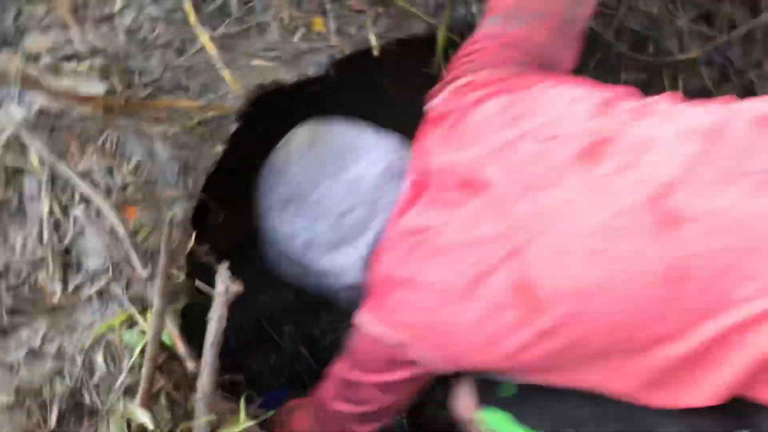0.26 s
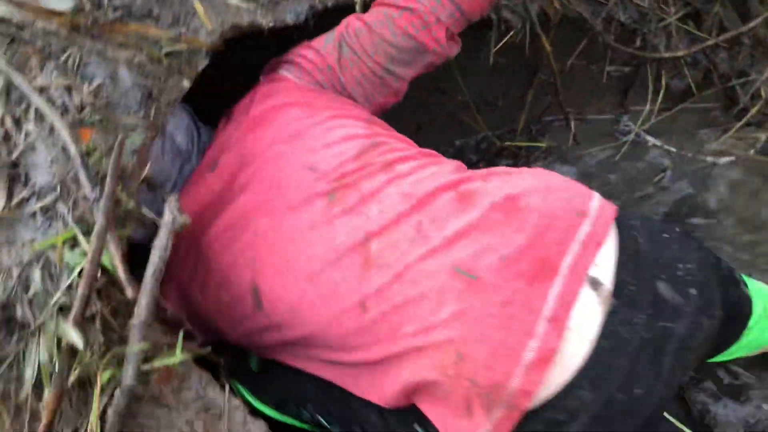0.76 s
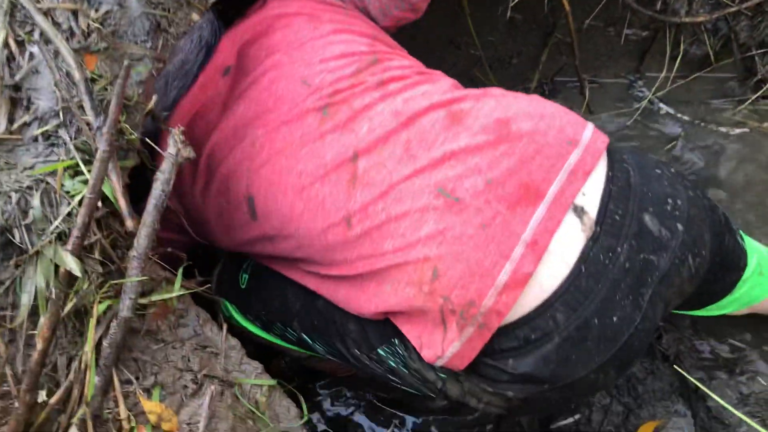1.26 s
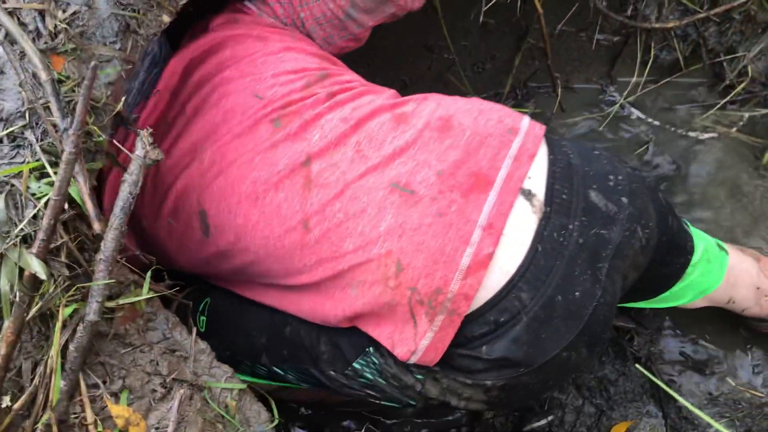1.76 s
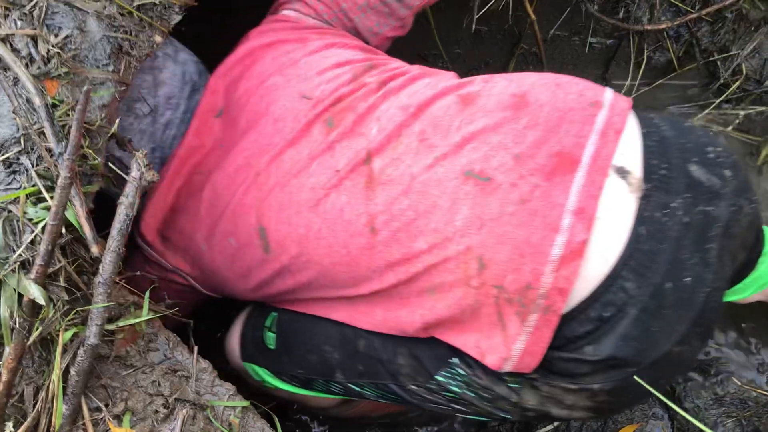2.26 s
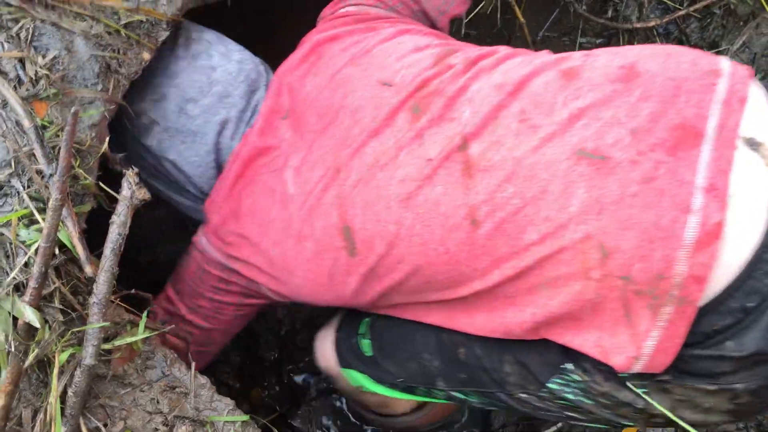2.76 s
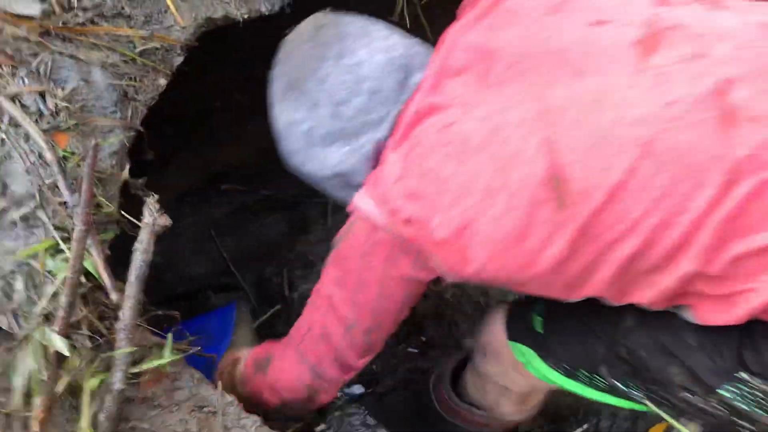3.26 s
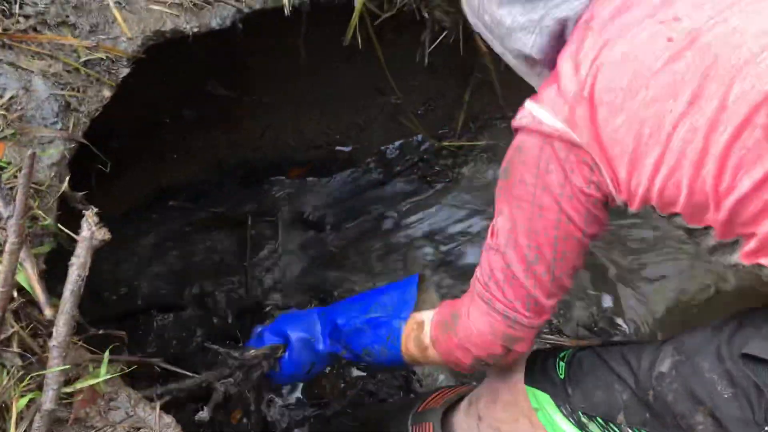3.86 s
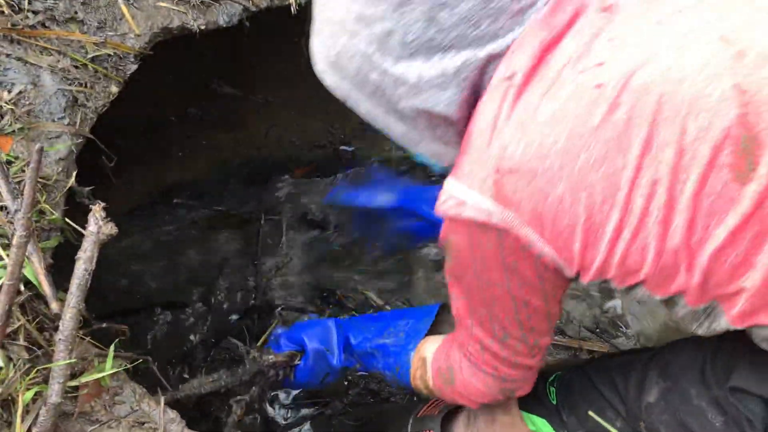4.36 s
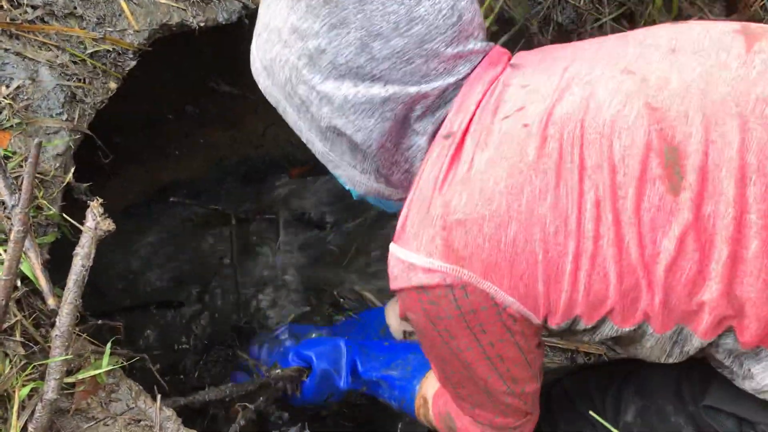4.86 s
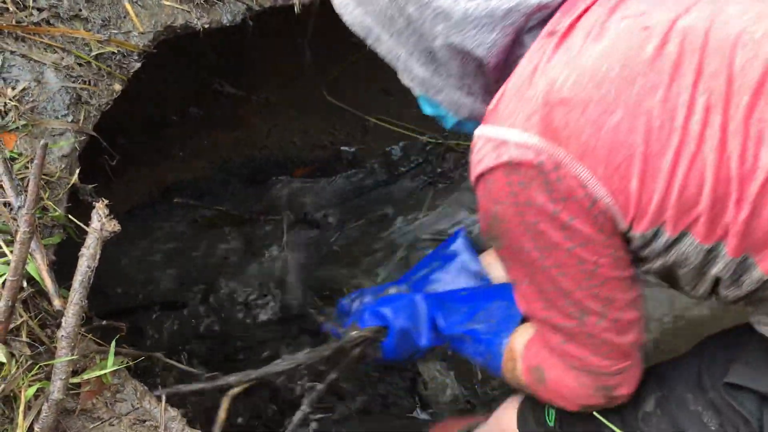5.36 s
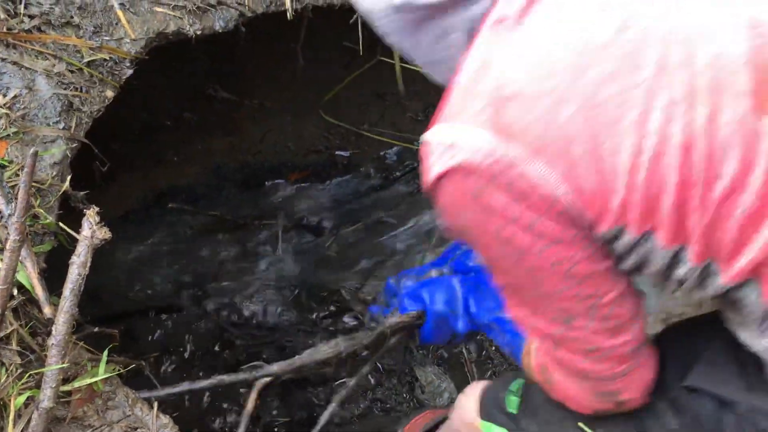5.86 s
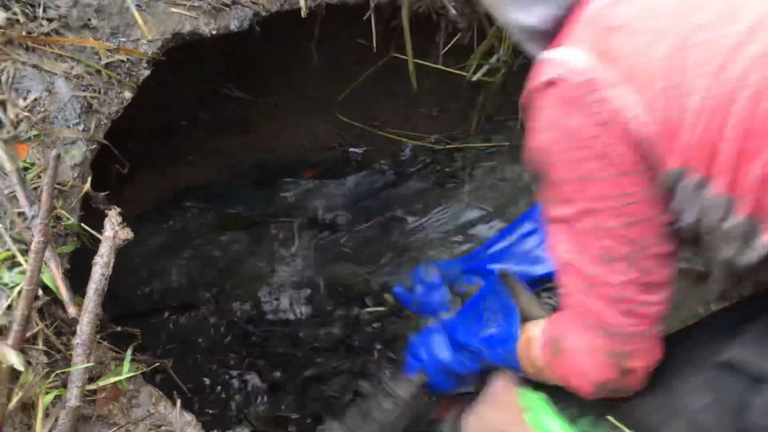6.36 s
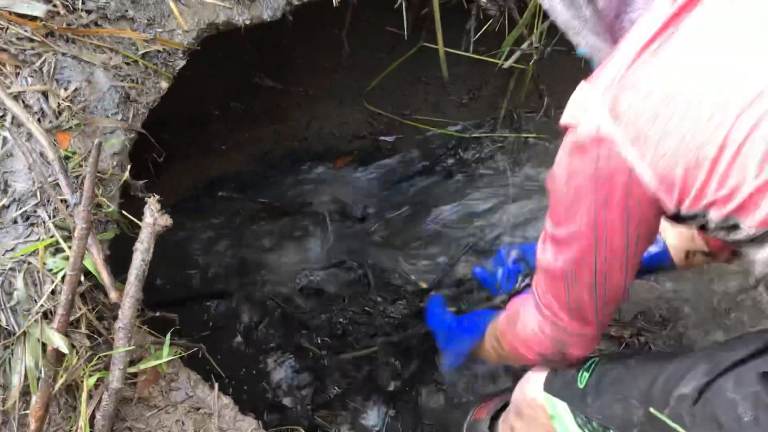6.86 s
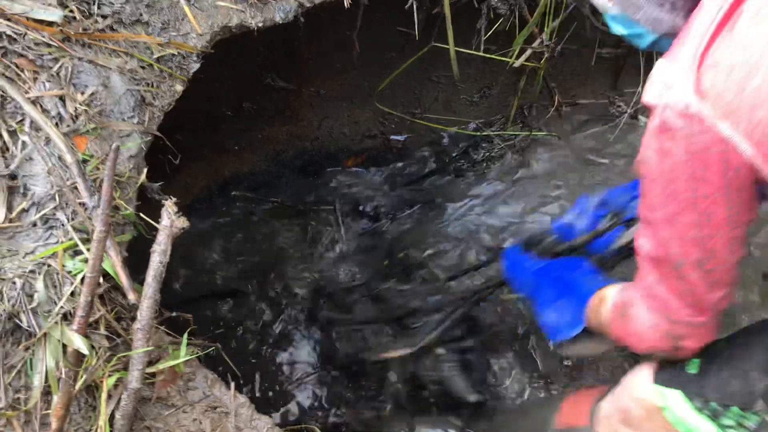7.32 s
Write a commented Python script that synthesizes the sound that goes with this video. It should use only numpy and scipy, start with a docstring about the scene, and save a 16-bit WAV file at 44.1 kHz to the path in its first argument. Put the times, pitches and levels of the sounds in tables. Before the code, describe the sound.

A close single microphone catches gurgling water being stirred at a pipe opening. It is duller at first, with single bubble plops and a low glug, then a woody crack opens into brighter trickling and small twig crackles. Thick sloshes and plops burst out late, a twig snaps loudly, and a faint engine far away climbs in pitch.

```python
"""Shallow water trickles through a culvert's mouth while hands clear it; a far engine drones over a rumble.
Clouds of ringing bubbles make the water, single larger bubbles plink, and noise bursts tick as wet twigs.
From about 2.4 s deep air pockets glug and mud sloshes; at 3.3 s a stick cracks, as splintery noise and ringing modes.
Near 6.5 s bubbles and sloshes crowd together, a twig snaps hard at 6.8 s and the engine climbs to the end.
Water and wood carry the pipe's short echo, made of decaying noise."""
import sys
import numpy as np
from scipy import signal
from scipy.fft import rfft, irfft, next_fast_len
from scipy.io import wavfile
from scipy.ndimage import map_coordinates

SR = 44100
rng = np.random.default_rng(int(sys.argv[2]) if len(sys.argv) > 2 else 0)


def dump_mix(stems):
    """Bounce the given channels to the path in sys.argv[1] as a 16-bit WAV at rate SR."""
    frames = np.atleast_2d(stems).T  # one column per channel
    limited = np.clip(frames, -1, 1)  # hard clip at full scale
    pcm = np.round(limited * 32767).astype(np.int16)
    wavfile.write(sys.argv[1], SR, pcm)


N = 334719  # length in samples

# Every spectrum is a noise colour [f/Hz, relative density level/dB]; its sound is then set to rms 1.
# Diffuse echo of the culvert wall: [f/Hz, time to fall 60 dB/s]
PIPE_DECAY = [(200, 0.23), (1000, 0.23), (3000, 0.15), (8000, 0.15), (15000, 0.2)]

# Spectrum of the large bubbles with the pipe's mouth covered: [f/Hz, level/dB]
GURGLE_COVERED_SPECTRUM = [(250, -23), (480, -11.5), (640, -5.5), (850, 0), (1100, -1.5), (1500, -8),
                           (2200, -11.5), (4000, -34)]
# The same with the mouth clear: [f/Hz, level/dB]
GURGLE_OPEN_SPECTRUM = [(250, -23), (520, -12), (750, -5.5), (1000, -1), (1300, -2), (1600, -4.5),
                        (2200, -8.5), (4000, -42)]
# Spectrum of the small bubbles at the mouth: [f/Hz, level/dB]
TRICKLE_SPECTRUM = [(350, -48), (700, -2), (1300, 0.5), (1900, -1.5), (2900, -1.5), (4200, -5),
                    (6000, -10.5), (10000, -19)]
# Spectrum of the droplets: [f/Hz, level/dB]
SPRAY_SPECTRUM = [(600, -50), (2500, 6), (4500, -2), (7000, 0), (8800, 0.5), (10300, -6), (12000, -1.5),
                  (15500, -3)]
# How far the body is clear of the pipe's mouth: [t/s, openness from 0 covered to 1 open]
MOUTH_CLEAR = [(0, 0.53), (.5, 0.24), (2.6, 0.042), (3.6, 0.59), (4.4, 0.96), (7.59, 0.71)]
# How hard the hands stir the water: [t/s, level over the calm flow/dB], scaled per layer by the GROWS values
STIRRING = [(0, 4.5), (.35, -1), (3.1, 1), (3.45, 5), (3.9, 2.5), (6.05, 0.5), (6.66, 7.5), (6.97, 1),
            (7.59, 5.5)]
GURGLE_DB, TRICKLE_DB, SPRAY_DB = -44, -47, -53  # calm flow, mouth covered
GURGLE_GROWS, TRICKLE_GROWS, SPRAY_GROWS = .7, 1, 0.82  # dB gained per dB of stirring
GURGLE_OPEN_DB, SPRAY_OPEN_DB = -3.5, 4.5  # change when the mouth is clear
SURGE_DB, EDDY_DB = 1.06, 0.46  # ripples shared by the whole stream; slow eddies of gurgle and trickle apart

# Distant engine: [t/s, firing rate f/Hz, level of the boom on that rate/dB]
ENGINE_RUN = [(0, 45.9, -67), (.6, 48, -50), (1.3, 53.1, -58), (1.7, 59.23, -46), (3, 60.5, -56),
              (6, 63, -57.5), (6.35, 60.4, -61), (6.7, 72, -56), (7.59, 82.2, -49.5)]
# Mean levels of the engine's second and third harmonics: [level/dB]
ENGINE_HARMONICS_DB = [-57, -66]
# Spectrum of the outdoor rumble: [f/Hz, level/dB]
RUMBLE_SPECTRUM = [(16, -60), (25, -32), (36, -7.5), (50, -2.5), (85, -2.5), (105, -2.5), (145, -4),
                   (200, -11), (280, -16), (400, -19.5), (700, -36), (1200, -78)]
# Rumble over time: [t/s, level/dB]
RUMBLE_LEVEL = [(0, -48.5), (1.3, -49), (4.6, -52), (7.59, -44)]

# Single large bubbles: [t/s, level before PLOP_TRIM_DB/dB, pitch f/Hz]
PLOP_EVENTS = [(0.392, -20.5, 1000), (0.809, -20.5, 960), (0.965, -20, 1860), (1.103, -21, 1095),
               (1.509, -24.5, 894), (1.761, -14.5, 2800), (1.969, -25, 914), (2.287, -21, 1175),
               (2.741, -17.5, 990), (2.959, -22, 1150), (3.155, -20, 1520), (3.611, -16, 1193),
               (4.133, -13.5, 2030), (4.464, -21, 1160), (5.445, -14.5, 1530), (5.61, -22, 1330),
               (5.759, -15.5, 2850), (6.318, -17, 1650), (6.452, -11, 1330), (6.471, -9, 1140),
               (6.497, -10, 830), (6.624, -15, 1034), (6.685, -7, 804), (7.156, -19, 1990),
               (7.209, -20, 1330), (7.237, -18.5, 865)]
PLOP_TRIM_DB = -2.0  # on the plops and the lesser plips alike
# Lesser bubbles break at random, higher in pitch when the pipe's mouth is clear
PLIP_PER_S, PLIP_DB, PLIP_HZ, PLIP_OPEN_OCTAVES, PLIP_SPREAD_OCTAVES = 3.5, -28.5, 859, 0.465, 0.24
# A smaller bubble pinches off each one: mean delay, relative level, pitch ratio
DAUGHTER_S, DAUGHTER_DB, DAUGHTER_RATIO = .013, -8.5, 1.26

# Wet twigs: [t/s, tick level/dB, woody knock relative level/dB, wet fizz relative level/dB], before trims
TWIG_EVENTS = [(1.2755, -23.5, -24, -28), (1.7624, -32.5, 9, -21), (2.8485, -23, -11, -4),
               (3.1552, -35, -10, 2), (3.243, -21.5, -21, -3), (5.2884, -31.5, 6.5, -16),
               (5.5344, -22, -4.5, -4), (5.7432, -26.5, -9, -25), (5.7874, -15, -7, -10),
               (5.9217, -23, -20, -4), (6.0863, -27, 1.5, 1), (6.6404, -20.5, -12, -3),
               (6.785, -5, -32, -13), (6.8355, -19, -4.5, -4), (7.3718, -25, -6, 0),
               (7.5518, -12.5, -1.5, -30)]
# Spectrum of the bright tick: [f/Hz, level/dB]
TICK_SPECTRUM = [(1500, -28), (3300, -4), (4500, 3.5), (7000, 1.5), (9000, -6.5), (12000, -12)]
# Spectrum of the woody knock: [f/Hz, level/dB]
KNOCK_SPECTRUM = [(300, -22), (900, -2), (1500, 2.5), (2900, 1), (4200, -6), (8000, -40)]
# Spectrum of the wet fizz: [f/Hz, level/dB]
FIZZ_SPECTRUM = [(6000, -30), (9000, 2), (12000, 5), (15500, -5)]
TWIG_TRIM_DB, KNOCK_TRIM_DB, FIZZ_TRIM_DB = -0.5, 4.5, 0.5
# While the tangle is being pulled, small twigs give way at random; the trims apply to them too
PULL_FROM_S, PULL_TO_S = 3.1, 6.4
RUSTLE_PER_S, RUSTLE_DB, RUSTLE_KNOCK_DB, RUSTLE_FIZZ_DB, RUSTLE_SPREAD_DB = 4.1, -30.5, -10, -7.5, 0.5

# Deep air pockets in the mud: [t/s, level/dB, starting pitch f/Hz, share of pitch gained over the bubble's life]
GLUG_EVENTS = [(2.359, -32, 378.6, 1.1), (2.498, -41, 405, .2), (7.502, -38, 394, 0.23)]

# Mud and water churned by the hands: [t/s, level/dB, length/s, low edge f/Hz, high edge f/Hz]
SLOSH_EVENTS = [(2.817, -44, 0.11, 200, 9000), (3.341, -38.5, 0.073, 1800, 14000),
                (3.408, -45, 0.25, 1190, 8850), (5.431, -39.5, 0.05, 700, 5000),
                (5.916, -35.5, 0.013, 350, 6000), (6.142, -36, 0.087, 380, 4050),
                (6.209, -33.5, 0.029, 130, 3050), (6.294, -37, 0.072, 350, 4970),
                (6.43, -31.5, 0.026, 250, 4500), (6.47, -31, 0.066, 450, 1900),
                (6.621, -31, 0.025, 200, 3000), (6.634, -24.5, 0.028, 199, 7040),
                (6.678, -28, 0.013, 350, 1300), (6.66, -36.5, 0.19, 650, 5500),
                (7.353, -28.5, 0.034, 250, 11000)]
# Spectrum of the churned mud: [f/Hz, level/dB]
SLOSH_SPECTRUM = [(80, 7), (180, -2), (400, 2), (750, 2.5), (1200, 1), (2000, -2.5), (4000, -5.5),
                  (7000, -8), (10000, -13), (15500, -6)]

# Quick fractures of the thick stick: [t/s, level/dB]
STICK_FRACTURES = [(3.3189, -16), (3.322, -6)]
# Ringing modes of the stick: [f/Hz, level before STICK_RING_DB/dB, time to fall 60 dB/s]
STICK_MODES = [(1105, -9, 0.078), (1370, -11, 0.059), (1880, -15, 0.071), (2300, 4.5, 0.046),
               (2840, -13, 0.078), (2840, -3, 0.054), (3400, -11, 0.048), (4100, -21, .07),
               (6900, -16, 0.04), (7500, -11, .05)]
# Spectrum of the splintering: [f/Hz, level/dB]
SPLINTER_SPECTRUM = [(200, -31), (450, -19), (700, -0.5), (1300, -1), (2500, 4), (3600, 0.5), (5200, -8),
                     (7200, -3.5), (10000, -10), (15500, -15)]
STICK_RING_DB = -13.0

TOP_HZ = 15850  # upper band limit


def amp(db):
    """Decibels to gain."""
    return 10 ** (np.asarray(db) / 20)


def unit(x):
    """Scale to rms 1."""
    return x / np.sqrt(np.mean(x ** 2) + 1e-20)


def along(points, hz):
    """Read (f/Hz, value) points on a log frequency axis."""
    f, v = np.transpose(points)
    return np.interp(np.log(hz + 1), np.log(f), v)


def curves(rows):
    """One value per sample for each column after the time."""
    s, *cols = np.transpose(rows)
    return [np.interp(np.arange(N) / SR, s, c) for c in cols]


def wobble(rate):
    """A smooth random curve, rate knots a second."""
    knots = rng.standard_normal(int(N * rate / SR) + 4)
    return map_coordinates(knots, [np.arange(N) * rate / SR])


def filtered(x, response):
    """Multiply x's spectrum by a response of frequency."""
    m = next_fast_len(len(x) + SR // 10)
    return irfft(rfft(x, m) * response(np.fft.rfftfreq(m, 1 / SR)), m)[:len(x)]


def coloured(x, spectrum):
    """Shape x by a spectrum, at rms 1."""
    return unit(filtered(x, lambda hz: amp(along(spectrum, hz))))


def add(track, s, sound):
    """Mix a sound into the track at time s."""
    part = track[max(round(s * SR), 0):][:len(sound)]
    part += sound[:len(part)]


def scattered(start, end, rate):
    """Irregular times, one at random in each slot of 1 / rate seconds."""
    slots = np.arange(start, end, 1 / rate)
    return slots + rng.random(len(slots)) / rate


def echo(x, wet_db):
    """Add the pipe wall's diffuse tail, a fresh one for each eighth of a second, decaying by frequency."""
    size = SR // 8
    pieces = np.pad(x, (0, -len(x) % size)).reshape(-1, size)
    noise = rng.standard_normal((len(pieces), SR // 4))
    hz, t, z = signal.stft(noise, SR, nperseg=256)
    decay = amp(-60 * t / along(PIPE_DECAY, hz)[:, None])
    onset = 1 - np.exp(-t / 0.0011)
    tails = signal.istft(z * decay * onset, SR, nperseg=256)[1]
    answers = signal.fftconvolve(pieces, tails / np.linalg.norm(tails[0]), axes=1)
    out = np.pad(x, (0, SR // 4))
    for k, answer in enumerate(answers):
        add(out, k * size / SR, amp(wet_db) * answer)
    return out


def bubble(t, hz, cycles, rise):
    """An air pocket swells over its first cycles, rings, and rises in pitch as it nears the surface."""
    age = t * hz / cycles  # the ring has lost 45 dB at age 1
    tone = np.sin(2 * np.pi * hz * t * (1 + rise * age / 2))
    swell = 1 - np.exp(-(t * hz / 1.55) ** 2)
    return tone * amp(-45 * age) * swell


def bubbling(rate, low_hz, high_hz, cycles, spread_db, wet_db, wash):
    """A cloud of echoing bubbles of all sizes over a noise wash of unresolved ones."""
    when, size, strength, life, climb = rng.random((int(rate * N / SR), 5)).T
    hz = low_hz * (high_hz / low_hz) ** size
    life = cycles * (.5 + life)
    gain = hz * amp(spread_db * np.minimum(-np.log(1 - strength), 3))
    length = (life / hz * SR).astype(int) + 1
    # lay all bubbles end to end: which bubble each sample belongs to, and its step within it
    which = np.repeat(np.arange(len(hz)), length)
    step = np.arange(len(which)) - (np.cumsum(length) - length)[which]
    rings = gain[which] * bubble(step / SR, hz[which], life[which], 0.27 * climb[which])
    cloud = np.bincount((when * N).astype(int)[which] + step, rings, N)[:N]
    return unit(echo(cloud, wet_db)[:N]) + wash * rng.standard_normal(N)


def spatter(rate, spread_db):
    """Tiny drops and crumbs of mud land at random, each a brief decaying tick of noise; rms 1."""
    when, strength = rng.random((int(rate * N / SR), 2)).T
    force = amp(spread_db * np.minimum(-np.log(1 - strength), 3))
    hits = np.bincount((when * N).astype(int), force, N)
    decay = amp(-60 * np.arange(SR // 20) / SR / 0.037)
    envelope = signal.fftconvolve(hits, decay)[:N]
    return unit(echo(envelope * rng.standard_normal(N), wet_db=-2.5)[:N])


def stream():
    """Large bubbles gurgle inside the pipe, small ones tinkle at its mouth, droplets fizz on the mud."""
    stir_db, = curves(STIRRING)
    clear = np.clip(curves(MOUTH_CLEAR)[0], 0, 1)
    gurgle_db = GURGLE_DB + GURGLE_GROWS * stir_db + GURGLE_OPEN_DB * clear + EDDY_DB * wobble(4.88)
    trickle_db = TRICKLE_DB + TRICKLE_GROWS * stir_db + EDDY_DB * wobble(5)
    spray_db = SPRAY_DB + SPRAY_GROWS * stir_db + SPRAY_OPEN_DB * clear
    drops = spatter(rate=48, spread_db=5.5)
    gurgle = bubbling(rate=420, low_hz=416.0, high_hz=2407, cycles=16.2,
                      spread_db=3.0, wet_db=-0.5, wash=1.0)
    trickle = bubbling(rate=750, low_hz=1111, high_hz=6596, cycles=42,
                       spread_db=5.5, wet_db=-1.5, wash=1.0) + 0.39 * drops
    spray = bubbling(rate=1200, low_hz=3480, high_hz=15820, cycles=42,
                     spread_db=7.0, wet_db=-1.0, wash=0.69) + 1.04 * drops
    # a body in front of the mouth deepens the gurgle and shades the highest fizz
    gurgle_covered = coloured(gurgle, GURGLE_COVERED_SPECTRUM)
    gurgle_open = coloured(gurgle, GURGLE_OPEN_SPECTRUM)
    gurgle = (1 - clear) * gurgle_covered + clear * gurgle_open
    spray_open = coloured(spray, SPRAY_SPECTRUM)
    spray_covered = filtered(spray_open, lambda hz: 1 / np.sqrt(1 + (hz / 12000) ** 4))
    spray = clear * spray_open + (1 - clear) * spray_covered
    surge = amp(SURGE_DB * wobble(15))  # each ripple stirs bubbles of all sizes
    return surge * (amp(gurgle_db) * gurgle
                    + amp(trickle_db) * coloured(trickle, TRICKLE_SPECTRUM)
                    + amp(spray_db + 1.2 * wobble(35)) * spray)


def distance():
    """A far engine drones and speeds up; only its lowest harmonics carry over the rumble."""
    hz, boom_db = curves(ENGINE_RUN)
    phase = 2 * np.pi * np.cumsum(hz * (1 + 0.0095 * wobble(6))) / SR
    drone = np.zeros(N)
    for k, db in enumerate([boom_db, *ENGINE_HARMONICS_DB], 1):
        drone += amp(db + 2.0 * wobble(6.8)) * unit(np.sin(k * phase))
    rumble_db = curves(RUMBLE_LEVEL)[0] + 1.2 * wobble(4)
    return drone + amp(rumble_db) * coloured(rng.standard_normal(N), RUMBLE_SPECTRUM)


def plops():
    """Large bubbles stand out among lesser ones; each sheds a smaller one and has its own echo."""
    out, t = np.zeros(N), np.arange(SR // 10) / SR

    def ring(hz):
        """One bubble with a softened onset."""
        return bubble(t, hz, cycles=20.2, rise=0.2) * (1 - np.exp(-t / 0.00071))

    plips = []
    for s in scattered(0, N / SR, PLIP_PER_S):
        clear = np.interp(s, *np.transpose(MOUTH_CLEAR))
        octaves = PLIP_OPEN_OCTAVES * clear + PLIP_SPREAD_OCTAVES * rng.standard_normal()
        plips.append((s, PLIP_DB, PLIP_HZ * 2 ** octaves))
    for s, db, hz in list(PLOP_EVENTS) + plips:
        pair = ring(hz)
        delay = DAUGHTER_S * (.5 + rng.random())
        add(pair, delay, amp(DAUGHTER_DB) * ring(DAUGHTER_RATIO * hz))
        add(out, s, amp(db + PLOP_TRIM_DB) * echo(pair, wet_db=-5.0))
    return out


def twigs():
    """A twig's fibres let go in a spiky burst that builds for a few milliseconds, bright or woody."""
    out, t = np.zeros(N), np.arange(SR // 20) / SR
    rustle = []
    for s in scattered(PULL_FROM_S, PULL_TO_S, RUSTLE_PER_S):
        spread = RUSTLE_SPREAD_DB * rng.standard_normal(3)
        rustle.append((s, *([RUSTLE_DB, RUSTLE_KNOCK_DB, RUSTLE_FIZZ_DB] + spread)))
    envelope = amp(-60 * t / 0.021) * (1 - np.exp(-t / 0.0026))
    for s, db, knock_db, fizz_db in list(TWIG_EVENTS) + rustle:
        # random gain per sample makes the noise spiky
        fibres = rng.standard_normal((3, len(t))) * amp(3.1 * rng.standard_normal(len(t)))
        tick = coloured(fibres[0], TICK_SPECTRUM)
        knock = amp(knock_db + KNOCK_TRIM_DB) * coloured(fibres[1], KNOCK_SPECTRUM)
        fizz = amp(fizz_db + FIZZ_TRIM_DB) * coloured(fibres[2], FIZZ_SPECTRUM)
        burst = (tick + knock + fizz) * envelope
        add(out, s, amp(db + TWIG_TRIM_DB) * echo(burst, wet_db=-8.5))
    return out


def glugs():
    """Deep pockets of air ring longer and glide upwards."""
    out, t = np.zeros(N), np.arange(SR // 4) / SR
    onset = 1 - np.exp(-t / 0.0097)
    for s, db, hz, rise in GLUG_EVENTS:
        glug = bubble(t, hz, cycles=64, rise=rise) * onset
        add(out, s, amp(db) * echo(glug, wet_db=-5))
    return out


def sloshes():
    """Each shove folds air into muddy water: a burst of short bubbles that swells and drains away."""
    out, t = np.zeros(N), np.arange(SR) / SR
    churn = bubbling(rate=2300, low_hz=163.8, high_hz=14500, cycles=11.5,
                     spread_db=3.0, wet_db=-6.0, wash=0.37)
    churn = coloured(churn, SLOSH_SPECTRUM)
    for s, db, length, low_hz, high_hz in SLOSH_EVENTS:
        band = lambda hz: 1 / np.sqrt((1 + (low_hz / (hz + 1)) ** 4) * (1 + (hz / high_hz) ** 4))
        water = filtered(np.roll(churn, -round(s * SR))[:SR], band)
        swell = (1 - np.exp(-t / 0.0023)) / (1 + (t / length) ** 6)
        burst = water * swell
        burst /= np.sqrt(np.sum(burst ** 2) / np.sum(swell ** 2))  # same energy as the swell itself
        add(out, s, amp(db) * echo(burst, wet_db=-12.5))
    return out


def stick():
    """Fractures run through a thick stick, which rings briefly in front of the pipe."""
    out, t = np.zeros(N), np.arange(SR // 4) / SR
    for s, db in STICK_FRACTURES:
        fibres = rng.standard_normal(len(t)) * amp(4.8 * rng.standard_normal(len(t)))
        add(out, s, amp(db) * coloured(fibres, SPLINTER_SPECTRUM) * amp(-60 * t / 0.038))
    ring = np.zeros(len(t))
    for hz, db, t60 in STICK_MODES:
        ring += amp(db - 60 * t / t60) * np.sin(2 * np.pi * (hz * t + rng.random()))
    add(out, STICK_FRACTURES[0][0], amp(STICK_RING_DB) * ring * (1 - np.exp(-t / 0.0013)))
    return echo(out, wet_db=-9.5)[:N]


def scene():
    """Sum the water, the wood and the far background into one channel."""
    return (stream() + distance() + plops() + twigs() + glugs() + sloshes() + stick())[None]


def record(dry):
    """Round off peaks near full scale, roll off the deep bass and cut everything from TOP_HZ up."""
    held = dry[0] / (1 + dry[0] ** 8) ** (1 / 8)
    return filtered(held, lambda hz: (hz < TOP_HZ) / np.sqrt(1 + (27 / (hz + 1)) ** 8))[None]


dry = scene()
out = record(dry)
dump_mix(out)
```